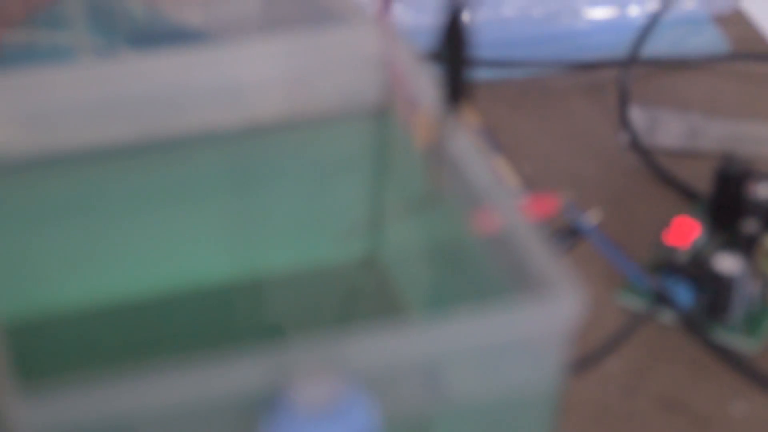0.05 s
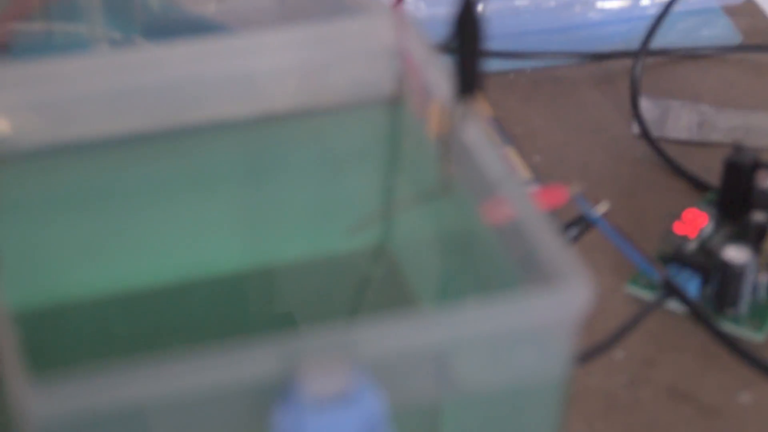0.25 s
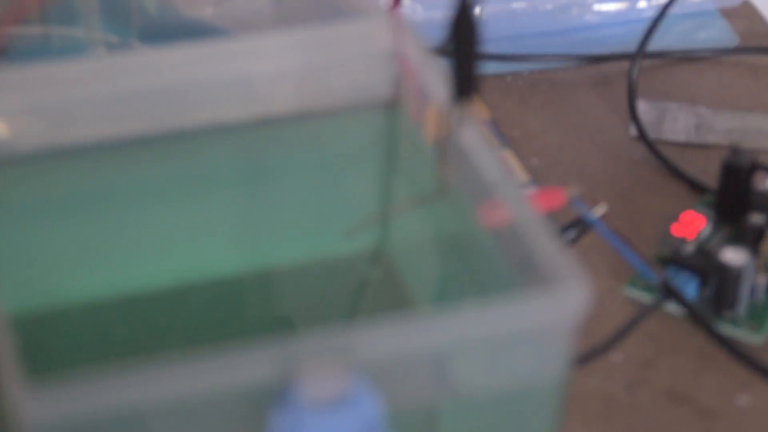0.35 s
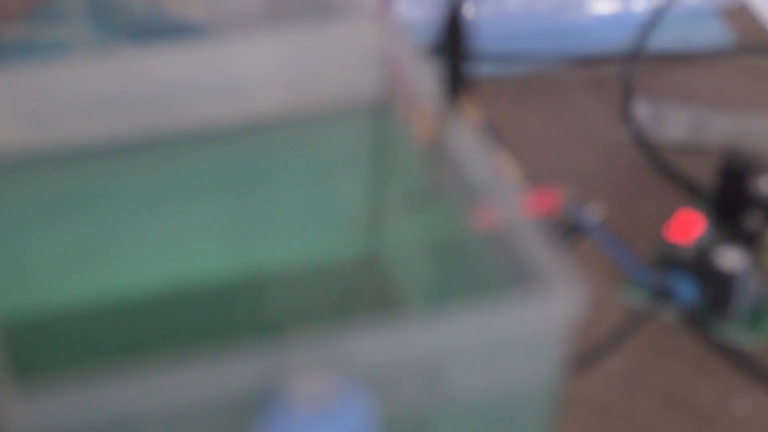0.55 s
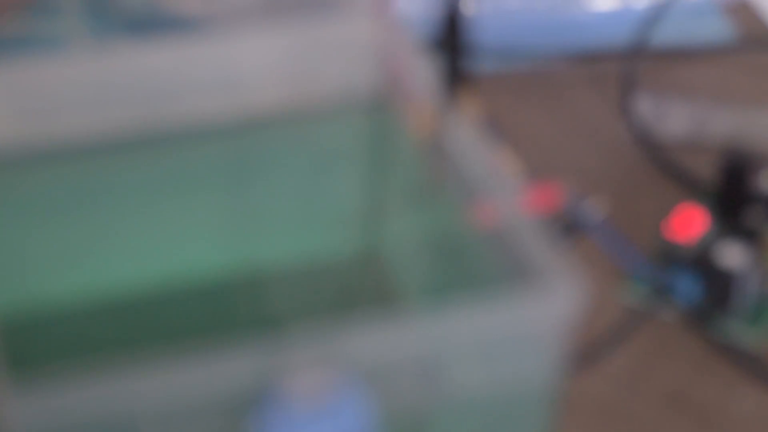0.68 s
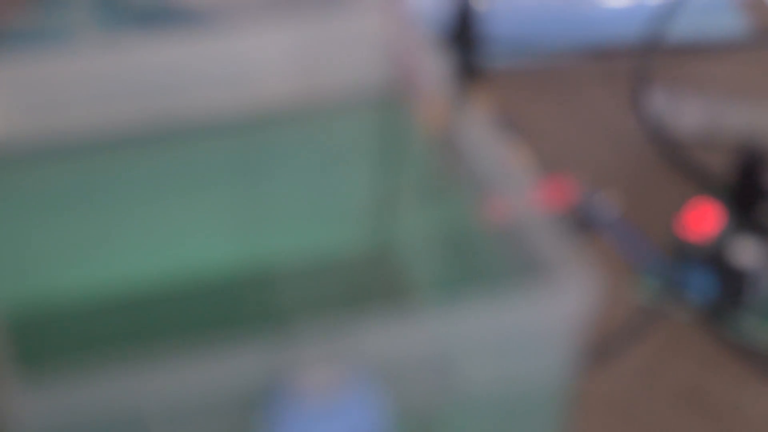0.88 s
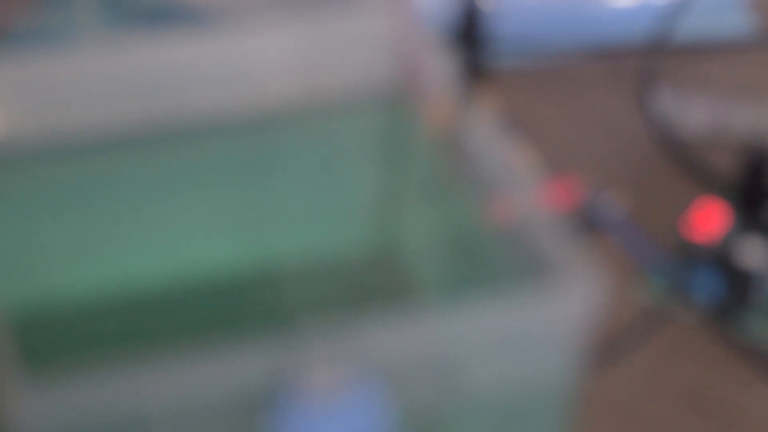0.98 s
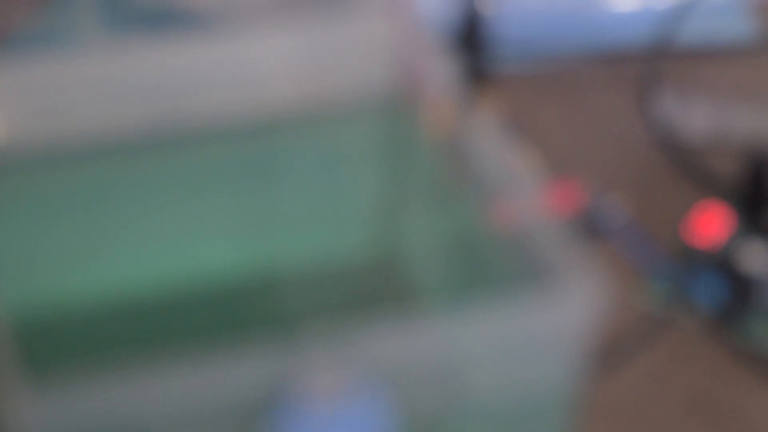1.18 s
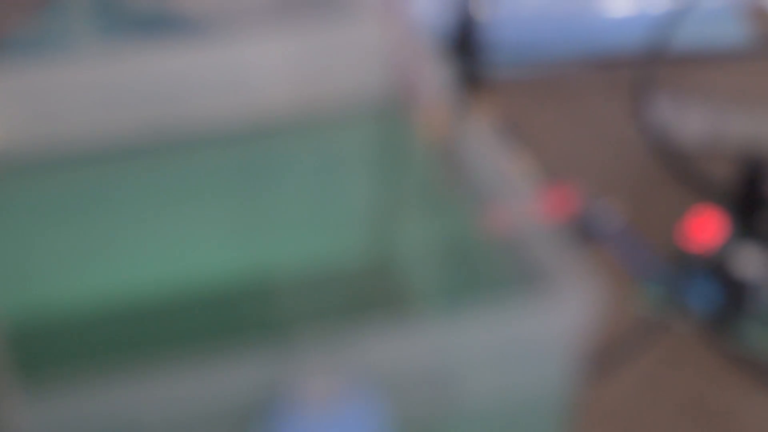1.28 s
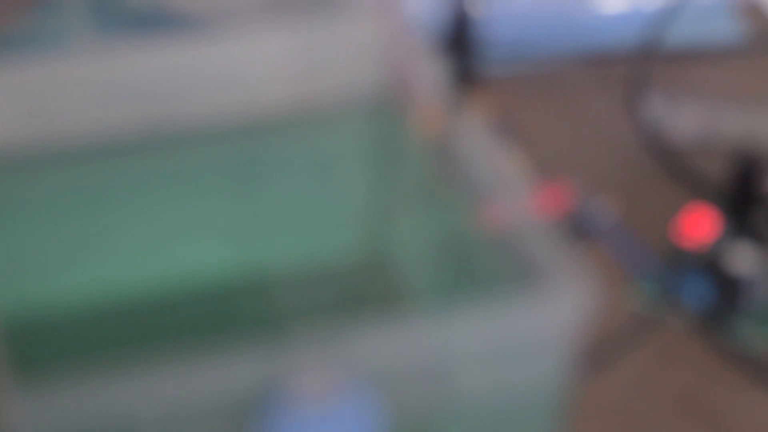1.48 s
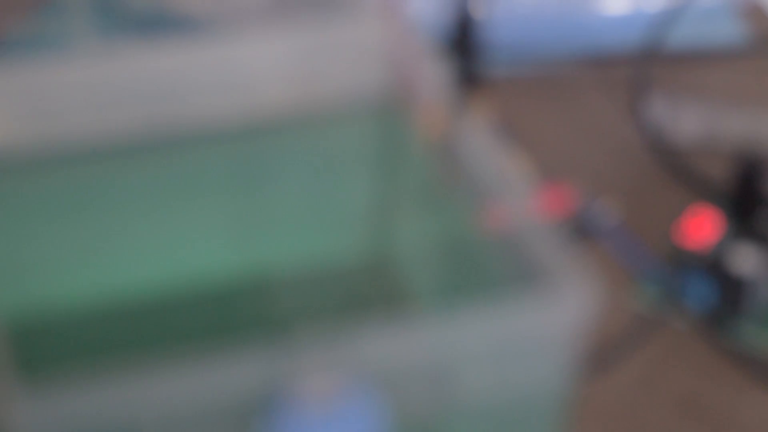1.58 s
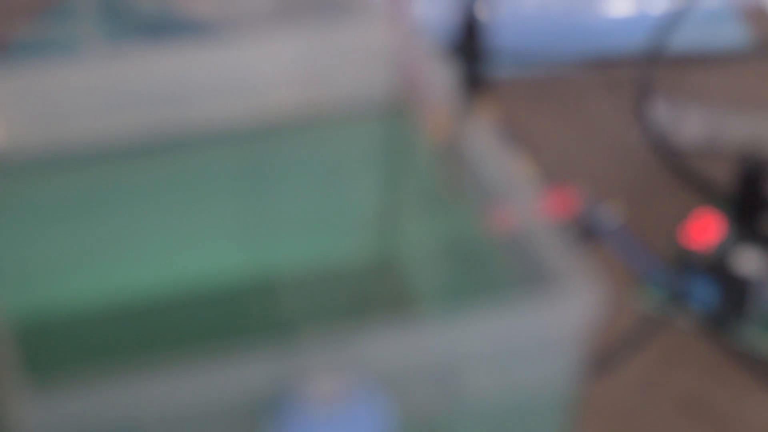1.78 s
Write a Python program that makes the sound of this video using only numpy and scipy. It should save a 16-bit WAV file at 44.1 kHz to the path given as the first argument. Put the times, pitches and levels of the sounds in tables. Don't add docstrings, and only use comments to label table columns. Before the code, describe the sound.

A small lens focus motor, heard very close through the camera body, gives a loud plastic clack and short jerk, then a steady thin whir, a tiny pause, and a rougher returning whir with knocks, over quiet room hiss.

```python
import sys
import numpy as np
from scipy import signal
from scipy.fft import rfft, irfft, next_fast_len
from scipy.io import wavfile
from scipy.ndimage import uniform_filter1d, map_coordinates

SR = 44100
rng = np.random.default_rng(int(sys.argv[2]) if len(sys.argv) > 2 else 0)


def wav_out(sig):
    wavfile.write(sys.argv[1], SR, np.round(np.clip(np.atleast_2d(sig).T, -1, 1) * 32767).astype(np.int16))


def boost(x):
    u = np.asarray(x, float) / 20
    return 10 ** u


N = 81585
FFT_SIZE = next_fast_len(N + 4096)
SPLIT_HZ, BRIGHT_HZ = 2700, 5200


def unit(x):
    return x / np.sqrt(np.mean(x ** 2))


def walk(rate_hz):
    k = int(SR / rate_hz)
    once = uniform_filter1d(rng.standard_normal(N), k)
    return unit(uniform_filter1d(once, k))


def stereo(left_db, right_db):
    return boost(np.array([[left_db], [right_db]]))


def butter(x, order, hz, kind):
    return signal.sosfilt(signal.butter(order, hz, kind, fs=SR, output="sos"), x)


def coloured(table, db):
    hz, density_db = np.array(table).T
    log_f = np.log(np.fft.rfftfreq(N, 1 / SR) + 1)
    spectrum = rfft(rng.standard_normal(N)) * boost(np.interp(log_f, np.log(hz), density_db))
    return boost(db) * unit(irfft(spectrum, N))


# f/Hz, level/dB per Hz
ROOM = [(25, -14), (60, -29.5), (130, -10), (300, -7.5), (1300, -9), (1950, -12), (3500, -28), (15000, -36)]
# f/Hz, level/dB per Hz
SIDE_HISS = [(15, -46), (25, -35), (334, -14), (539, -14), (997, -8), (2110, -23.5), (14800, -33)]
# f/Hz, level/dB rms, left-right/dB
WHINE = [(2190, -66.5, -18), (4100, -110, -9), (4500, -82, -33)]


def room():
    t = np.arange(N) / SR
    sign = np.array([[1], [-1]])
    whine = sum(boost(db + 1.5 + sign * pan_db / 2) * np.sin(2 * np.pi * hz * t) for hz, db, pan_db in WHINE)
    tone = coloured(ROOM, -58) * boost(0.13 * walk(24))
    return tone + sign * coloured(SIDE_HISS, -66) + whine


def mode(hz, width_hz):
    z = np.exp(-2j * np.pi * np.fft.rfftfreq(FFT_SIZE, 1 / SR) / SR)
    r = np.exp(-np.pi * abs(width_hz) / SR)
    e = np.exp(2j * np.pi * hz / SR)
    return (1 - r) * (1 / (1 - r * e * z) - 1 / (1 - r * z / e)) / 2j


def ring(force, response):
    return irfft(rfft(force, FFT_SIZE) * response, FFT_SIZE)[..., :N]


# f/Hz, width/Hz, left/dB, right/dB
HOUSING = [(400, 2500, -33, -36), (958, 222, -19.5, -18), (1061, 145, -21.5, -17), (1833, 190, -20.5, -14),
           (1820, 763, -21, -15), (2016, 270, -7, -6.5), (2309, 646, -13, -6.5), (2522, 272, -19, -2),
           (2933, 221, -20, -0.75), (3086, 196, -14, 1.14), (3293, 181, -3, 1), (3770, 2040, -26.5, -11),
           (3992, 199, -1, -51), (4172, 240, -3, -47)]
# f/Hz, width/Hz, left/dB, right/dB
BARREL = [(4686, 1060, -16, -19.5), (5276, 900, -23, -20), (5920, 525, -12.5, -7.5), (5900, 353, -16, -8.5),
          (6290, 326, -15, -16), (7044, 196, -20.5, -24), (7900, 470, -34, -30.5), (9250, 900, -26.5, -29),
          (9700, 2500, -29.5, -34), (11210, 1110, -29.5, -37.5), (11950, 1700, -35.5, -37.5),
          (13100, 1500, -38, -55)]
# f/Hz, width/Hz, left/dB, right/dB
BRACKETS = [(4600, 63, -9.5, -12.5), (7650, 230, -31.5, -33), (2150, 22, -12, -60.5), (10270, 14, -29, -29)]
MODES = HOUSING + BARREL + BRACKETS
LEFT_SIGN = [-1, -1, 1, -1, 1, -1, 1, -1, 1, 1, -1, -1, 1, -1, 1, -1, -1, 1, 1, -1, 1, -1, 1, -1, 1, -1, 1,
             1, -1, 1]
RIGHT_SIGN = [-1, -1, 1, -1, 1, -1, 1, -1, 1, -1, 1, -1, 1, 1, 1, -1, 1, -1, 1, -1, 1, -1, 1, -1, 1, 1, 1,
              1, -1, 1]


def body(extra_db):
    response = 0
    for (hz, width_hz, left_db, right_db), a, b, more_db in zip(MODES, LEFT_SIGN, RIGHT_SIGN, extra_db):
        gain = np.array([[a], [b]]) * stereo(left_db, right_db) * boost(more_db)
        response = response + gain * mode(hz, width_hz)
    return response


def tilt(db):
    return np.interp(np.log([m[0] for m in MODES]), np.log((1000, 3500, 6400, 12000)), db)


def burst(start_s, db, ms):
    u = np.maximum(np.arange(N) / SR - start_s, 0) * 1000 / max(ms, .2)
    return boost(db) * u * np.exp(1 - u) ** 2 * np.resize(rng.standard_normal(2000), N)


def impulse(start_s, db):
    d = np.arange(N) - start_s * SR
    return boost(db) * np.sinc(d) * np.exp(-(d / 8) ** 2)


# t/s, level/dB peak
KNOCKS = [(.2532, 2), (.2569, -3.5), (.2709, -8), (.2802, -11.5), (.533, -22), (.588, -26), (.6665, -21),
          (.6797, -14.5), (.7, -22), (.707, -17), (.7203, -21.5), (1.0738, -21), (1.0958, -25),
          (1.1872, -27), (1.2787, -16), (1.3697, -9), (1.3927, -6.5), (1.4219, -8), (1.4498, -9),
          (1.472, -14.5), (1.4993, -16), (1.5128, -12), (1.5268, -15), (1.5342, -23), (1.5822, -20.5),
          (1.6314, -18), (1.65, -23.5), (1.7361, -15), (1.8379, -13.5)]
# f/Hz, width/Hz, left/dB, right/dB
CARRIER = [(1967, 108, -6.5, -7), (2580, 110, -17, 1), (3238, 87, -8, 1), (4070, 130, 7, -16)]
LEAD_S, LEAD_DB = .0016, -7
CRACK_HZ, CRACK_MS, CRACK_DB, CRACK_PAN_DB = 3000, .36, -6.5, -13.5


def knocks():
    blows = sum(impulse(s + LEAD_S, db) + impulse(s, db + LEAD_DB) for s, db in KNOCKS)
    rattle = sum(burst(s, db - 20, 1.8) for s, db in KNOCKS)
    u = np.arange(-40, 41) / SR
    wavelet = np.exp(-(u * 1000 / CRACK_MS) ** 2) * np.sin(2 * np.pi * CRACK_HZ * u)
    crack = np.convolve(blows, wavelet, "same")
    shaft = boost(0.76) * mode(1055, 18.6)
    carrier = sum(stereo(left_db, right_db) * mode(hz, width_hz) for hz, width_hz, left_db, right_db in CARRIER)
    path = boost(-3.5) * body(tilt((12, 1, -53, -26))) + shaft + carrier
    pan = stereo(CRACK_PAN_DB / 2, -CRACK_PAN_DB / 2)
    return boost(22.6) * ring(blows + rattle, path) + boost(CRACK_DB) * pan * crack


# t/s, level/dB peak, length/ms, low-mode drive/dB, high-mode drive/dB
CLACKS = [(0.2291, -24, 2, -10, -7), (0.2345, -25, 1.2, -20, 7), (0.2353, -10, 1.4, -19, -5),
          (0.2383, -27, 1.5, -14, -5), (0.2495, -6.5, 1.05, -0.5, -3), (0.2497, -0.5, 2.57, -9, -24),
          (0.2532, -7, 1.27, -7, 5.5), (0.2577, -8.5, 1.62, -8, -22), (0.267, -24.5, 2, -8.5, -12),
          (0.2809, -8, 1.49, -19, -29), (0.2855, -33, 1.5, -7, -8), (0.3111, -24.5, 1.5, -17, -6),
          (0.3773, -11, 1.82, -8, 2), (0.3835, -32, 1.4, 4, 4), (.394, -24, 3.06, 4.5, -6),
          (0.4003, -18, 0.92, 5, 7), (1.332, -23, 0.99, -20, -8.5), (1.337, -22, 1.6, -33, 5),
          (1.3399, -11, 1.7, -31, -3.5), (1.358, -22.5, 3.7, -8, -16), (1.364, -25, 1.2, -26, 10.5)]
# f/Hz, level/dB, t60/s
RINGS = [(1024, -44, 0.93), (3080, -39, 0.27), (3850, -36, 0.28), (4400, -55, 0.61), (416, -37, 0.15)]
RING_S = .254
CLACK_TILT_DB = (1.5, 0.8, -1.5, 3)


def clacks():
    u = np.maximum(np.arange(N) / SR - RING_S, 0)
    rings = sum(boost(db - 60 * u / t60_s + 0.5 * walk(67)) * np.sin(2 * np.pi * hz * u)
                for hz, db, t60_s in RINGS)
    bands = 0
    for s, db, ms, low_db, high_db in CLACKS:
        blow = burst(s, db, ms) + impulse(s + ms / 2000, db)
        bands = bands + boost(np.array([[low_db], [0], [high_db]])) * blow
    low, middle, high = bands
    force = butter(low, 3, SPLIT_HZ, "low")
    force = force + butter(middle, 3, (SPLIT_HZ, BRIGHT_HZ), "band")
    force = force + butter(high, 3, BRIGHT_HZ, "high")
    pawl = stereo(4.5, -9) * mode(4090, 170)
    path = body(tilt(CLACK_TILT_DB)) + pawl + boost(-9.0) * mode(1026, 92)
    return boost(16.5) * ring(force, path) + rings


def lighten(force, low_db):
    return butter(force, 3, SPLIT_HZ, "high") + boost(low_db) * butter(force, 3, SPLIT_HZ, "low")


def tooth_impacts(turns):
    size = round(SR / 142)
    teeth = np.tile(rng.standard_normal(size), 2) + boost(-16) * rng.standard_normal(2 * size)
    return map_coordinates(teeth, [turns * size % (2 * size)], mode="grid-wrap")


def brush_gate(turns, depth, scatter_db, second):
    half = (2 * turns).astype(int)
    press = np.exp(-(2 * turns % 1) / 0.5) * boost(scatter_db * rng.standard_normal(800))[half]
    return 1 + depth * press * np.where(half % 2, second, 1)


HUM = [1, 3, 3.9, 5.21, 6, 6.5, 7, 11, 12, 15, 17, 18, 22, 23, 29, 43, 45, 65]
# left/dB, right/dB, change on the return run/dB
HUM_DB = [(-28, -25.5, 4.5), (-26, -25, -1.5), (-44, -41, 12), (-38, -37, 6), (-34, -28, -1),
          (-30, -27, -2), (-28.5, -31.5, 5.5), (-32, -21.5, -27), (-18, -20.5, -17), (-5.5, -27, -13),
          (-36, -6.5, -33), (-37, -10.5, -15.5), (-19, -12.5, 0), (-53, -12, 10), (-23, -32, -14),
          (-38, -37, -9), (-16.5, -17, 0), (-23, -31, 3)]


def drive_hum(turns, hum_db, back):
    hum = 0
    for order, (left_db, right_db, change_db) in zip(HUM, HUM_DB):
        level_db = np.array([[left_db], [right_db]]) + back * change_db + hum_db + 3.1 * walk(49)
        hum = hum + boost(level_db) * np.sin(2 * np.pi * (order * turns + rng.random()))
    return hum


STOP_DB_PER_S, SPEED_WANDER = 912, .0012
ENGAGE_S, ENGAGE_RAMP_S, FREE_DB = .028, .0016, -18


def motor(effort, speed, extra_db, hum_db, back, brushes, tick_db, hiss_db):
    t = np.arange(N) / SR
    when, db = np.array(effort).T
    stop_db = STOP_DB_PER_S * np.maximum(t - when[-1], 0)
    gain = boost(np.interp(t, when, db) - stop_db + 0.59 * walk(60))
    turns_per_s = np.interp(t, *np.array(speed).T) * (1 + SPEED_WANDER * walk(55))
    turns = np.cumsum(turns_per_s) / SR
    gate = brush_gate(turns, *brushes)
    impacts = tooth_impacts(turns)
    grit = rng.standard_normal(N) + boost(-3.5) * rng.standard_normal((2, N))
    force = unit(gate * (boost(-5) * impacts + boost(-1.5) * grit))
    treble = signal.sosfiltfilt(signal.butter(4, 5000, "high", fs=SR, output="sos"), force)
    ticks = unit(sum(np.cos(2 * np.pi * m * turns) for m in range(35, 85, 2)))
    force = force + (boost(hiss_db) - 1) * treble + boost(tick_db + 0.43 * walk(31)) * ticks
    load = np.clip((t - when[0] - ENGAGE_S) / ENGAGE_RAMP_S, 0, 1)
    force = load * force + (1 - load) * lighten(force, FREE_DB)
    path = body(extra_db)
    scale = np.sqrt(np.mean(ring(force, path) ** 2))
    return ring(gain * force, path) / scale + gain * load * drive_hum(turns, hum_db, back)


# t/s, level/dB
JERK = [
    (.229, -97.5),
    (.232, -12.5),
    (.262, -24),
    (.286, -25),
    (.292, -29.5),
    (.316, -41.5),
    (.335, -57),
    (.36, -90),
]
RETURN_BRUSHES = (.6, 2.5, .6)  # depth, scatter/dB, second brush share


def jerk_run():
    return motor(JERK, [(.23, 141.5)], tilt(CLACK_TILT_DB), hum_db=-11, back=0,
                 brushes=RETURN_BRUSHES, tick_db=-20, hiss_db=-4)


# t/s, level/dB
OUT = [
    (.368, -58),
    (.372, -22.5),
    (.4, -30.5),
    (.43, -31.5),
    (.66, -30.5),
    (.685, -29),
    (.72, -31),
    (1.288, -31),
    (1.3, -45.5),
]
# t/s, rate/turns per s
OUT_SPEED = [(.44, 139), (.46, 143.8), (.515, 141), (.55, 143.4), (.635, 142.2), (.66, 139.3), (.75, 140.3),
             (.79, 142.5), (.81, 141.2), (.88, 140.6), (.905, 143.7), (.96, 141.3), (1.05, 142.3),
             (1.07, 141), (1.16, 143.3), (1.19, 140.9), (1.215, 142.5), (1.25, 139.9)]


def out_run():
    return motor(OUT, OUT_SPEED, tilt((0.078, 0.078, 0.093, 0.15)), hum_db=0, back=0,
                 brushes=(2.2, 3, .2), tick_db=-10.5, hiss_db=-2.5)


# t/s, level/dB
BACK = [
    (1.335, -93),
    (1.338, -26),
    (1.37, -32.5),
    (1.47, -32.5),
    (1.56, -32.5),
    (1.7, -33.5),
    (1.86, -33),
]
# t/s, rate/turns per s
BACK_SPEED = [(1.36, 137), (1.42, 139), (1.435, 142.3), (1.455, 141.5), (1.49, 143.3), (1.53, 140.8),
              (1.55, 142.7), (1.575, 142.4), (1.59, 141), (1.63, 143.6), (1.67, 141.4), (1.735, 141.1),
              (1.755, 143), (1.782, 142.1), (1.8, 140.3), (1.84, 142.2)]
BACK_DB = [3, -5, 2, -13, 2, 1, -8, -1, 1, -1, 0.5, -4, 5.5, 3.5, -3, 1.5, -0.5, -0.5, -0.5, -3, -7, 3, 1.5,
           1.5, 1.3, -12.5, -1, 9.5, -28, -13]


def back_run():
    return motor(BACK, BACK_SPEED, BACK_DB, hum_db=0.5, back=0.82,
                 brushes=RETURN_BRUSHES, tick_db=-7, hiss_db=-4.5)


def scene():
    runs = jerk_run() + out_run() + back_run()
    camera = butter(runs + clacks() + knocks(), 3, 323, "high")
    return camera + room()


def low_pass(x):
    return signal.sosfilt(signal.butter(12, 14950, fs=SR, output="sos"), x)


def record(dry):
    clip = 1.08
    return low_pass(np.clip(dry, -clip, clip))


dry = scene()
out = record(dry)
wav_out(out)
```